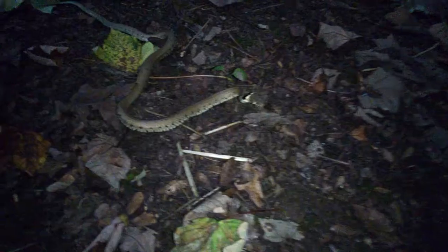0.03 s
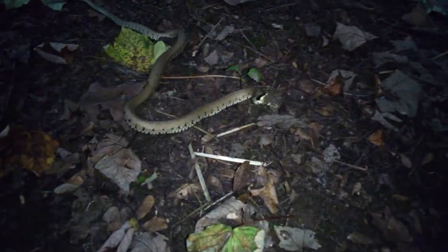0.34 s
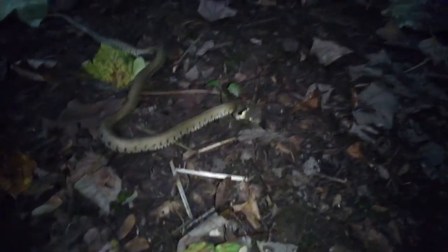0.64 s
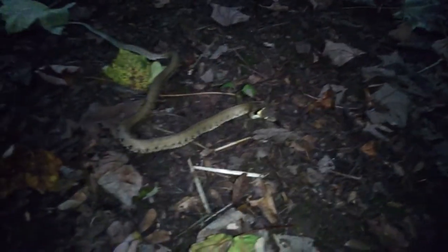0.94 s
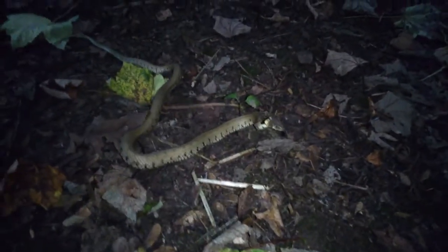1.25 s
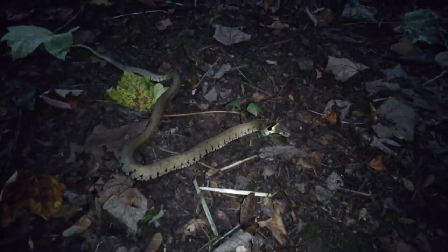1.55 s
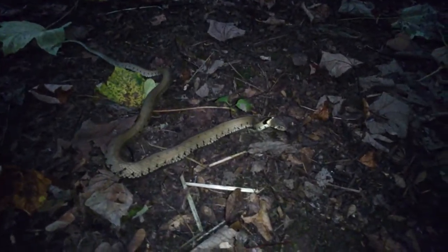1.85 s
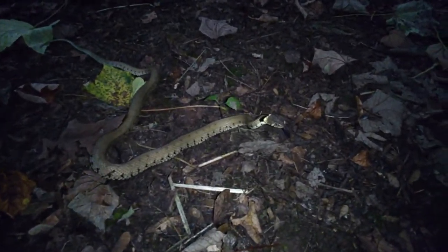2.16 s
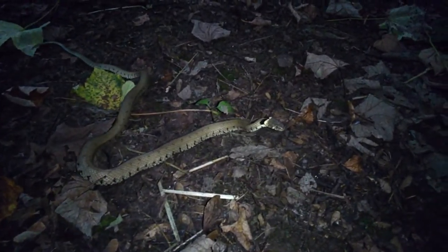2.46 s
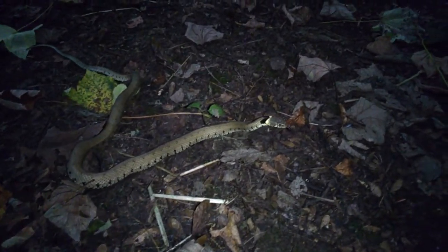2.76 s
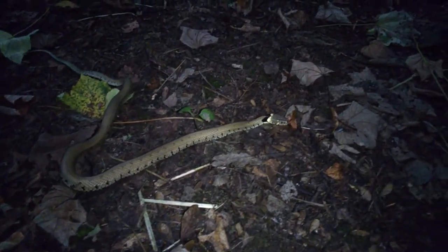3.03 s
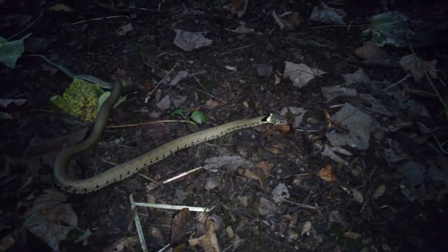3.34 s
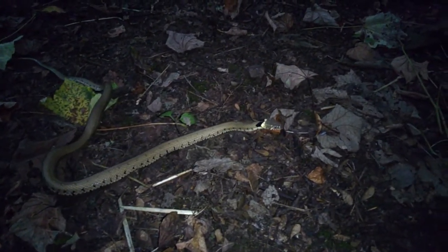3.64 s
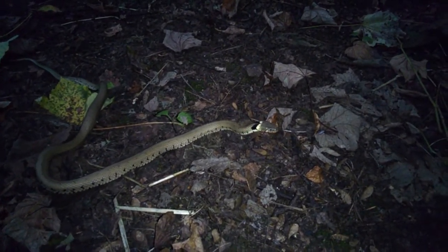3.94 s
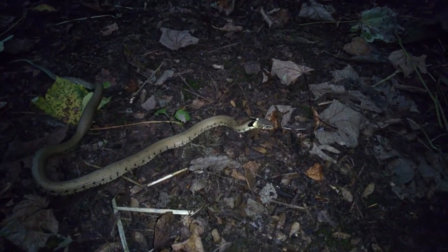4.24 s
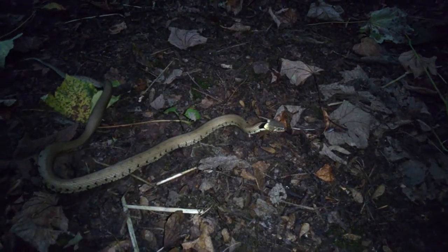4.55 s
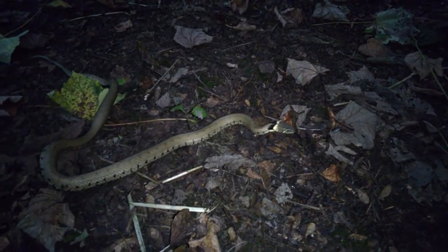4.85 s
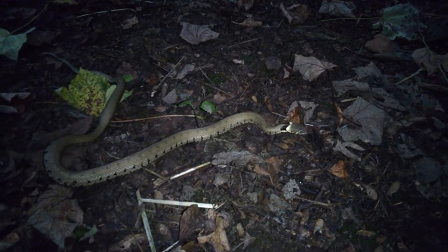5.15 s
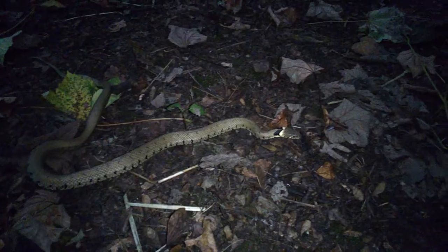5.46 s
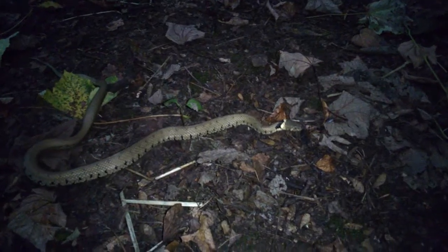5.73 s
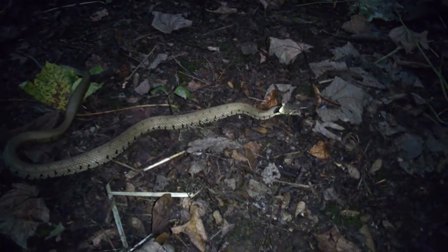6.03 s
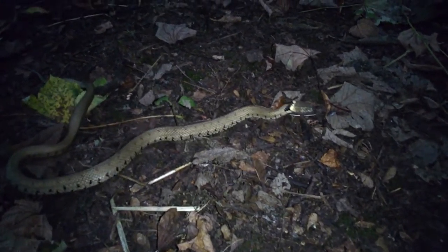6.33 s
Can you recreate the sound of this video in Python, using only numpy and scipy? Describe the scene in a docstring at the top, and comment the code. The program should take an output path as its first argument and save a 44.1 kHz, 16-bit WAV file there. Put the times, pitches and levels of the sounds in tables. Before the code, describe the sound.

Distant wind rumbles through a quiet wood for the whole six and a half seconds, swelling gently over a thin hiss. Faint, high bird calls echo from far trees. At about 0.8 seconds dry leaf litter gives one short, soft crunch underfoot, toward the left. From 1.2 to 2 seconds a far bird steps down four faint notes, and a very faint high tone wavers around 2.6 seconds. From 3.7 to 5.4 seconds a small, nearer songbird on the right sings one thin phrase of quick slurs and buzzy trills, loudest around 4.5 seconds and falling in pitch, each note trailing a long echo among the trunks. Faint far calls return around 6 seconds. Tiny dry handling ticks touch the handheld microphone here and there, clearest at about 1.6, 5.4 and 6.4 seconds.

```python
"""A quiet wood, microphone in the hand. Far wind rumbles and swells throughout, with a few handling ticks.
Faint birds call from the trees, and just before the first second dry litter crunches underfoot.
One far bird steps down a run of four notes; at 2.55 s a faint tone wavers near 3.9 kHz.
From 3.7 s a small, nearer songbird off to the right sings one thin, falling phrase;
the trunks scatter each note into a long tail."""
import sys
import numpy as np
from scipy import signal
from scipy.fft import rfft, irfft
from scipy.io import wavfile

SR = 44100
rng = np.random.default_rng(int(sys.argv[2]) if len(sys.argv) > 2 else 0)


def int16_out(signal):
    """Quantize to a 16-bit WAV file."""
    q = np.round(np.clip(np.atleast_2d(signal).T, -1, 1) * 32767)
    wavfile.write(sys.argv[1], SR, q.astype(np.int16))


N = 286209


def from_db(db):
    """Decibels to gain."""
    return 10 ** (np.asarray(db) / 20)


def rms_one(x):
    """Scale to unit power."""
    return x / np.sqrt(np.mean(x ** 2) + 1e-20)


def at_hz(points, hz):
    """Read a curve on a log-frequency axis."""
    known_hz, values = np.transpose(points)
    return np.interp(np.log(hz + 1e-9), np.log(known_hz), values)


def drift(per_s, size):
    """A random wander of spread about 1, turning per_s times a second."""
    position = np.arange(size) * per_s / SR
    return np.interp(position, np.arange(1024), rng.standard_normal(1024))


def add(track, s, sound):
    """Mix a sound in at s seconds."""
    start = int(s * SR)
    track[..., start:start + sound.shape[-1]] += sound[..., :N - start]


def panned(lean_db):
    """Left and right gains of constant power; a positive lean is to the left."""
    return rms_one(from_db([[lean_db / 2], [-lean_db / 2]]))


def air_noise(spectrum):
    """Unit-power noise of a given colour, alike on both sides in the bass, unrelated in the treble."""
    # Each row: frequency in Hz, correlation of left and right.
    likeness = [(50, .985), (150, .99), (300, .97), (700, .85), (1400, .45), (2800, .15), (12000, .05)]
    # Each row: frequency in Hz, left over right in dB.
    lean = [(35, -9), (85, 1.5), (180, 2.5), (380, 2.5), (700, 4.5), (1400, -3), (2800, 2.5), (7000, -11),
            (13000, -4.5)]
    # Each row: frequency in Hz, phase lead of the microphone's left port in radians.
    lead = [(35, .95), (85, .7), (180, .55), (400, .45), (900, .3), (2000, 0)]
    hz = np.arange(N // 2 + 1) * SR / N
    mid, side = rfft(rng.standard_normal((2, N)))
    alike = at_hz(likeness, hz)
    sides = np.array([[1], [-1]])
    pair = np.sqrt(1 + alike) * mid + np.sqrt(1 - alike) * side * sides
    ports = from_db(sides * at_hz(lean, hz) / 2) * np.exp(.5j * sides * at_hz(lead, hz))
    low_hz, high_hz = spectrum[0][0], spectrum[-1][0]
    skirts = 1 / np.sqrt((1 + (hz / high_hz) ** 12) * (1 + (low_hz / (hz + 1)) ** 12))
    return rms_one(irfft(pair * ports * skirts * from_db(at_hz(spectrum, hz)), N))


def wood(x, build_s, early_t60, late_t60, late_db):
    """Echoes off near and far trunks build up, then die away as the sum of two decays."""
    t = np.arange(2 * SR) / SR
    fade = from_db(-60 * t / early_t60) + from_db(late_db - 60 * t / late_t60)
    echoes = rng.standard_normal((2, len(t))) * fade * (1 - np.exp(-t / build_s))
    echoes /= np.sqrt(np.sum(echoes ** 2, axis=1, keepdims=True))
    return signal.fftconvolve(x[None], echoes, axes=1)[:, :N]


def wind(lull_rush_db=-49.5, lull_rumble_db=-37, buffet_db=0.83, hiss_db=-64):
    """Gusts in the far treetops swell a deep rumble and a softer rush, over a thin, even hiss."""
    # Each row: crest in seconds, half-width in seconds, added rush in dB, added rumble in dB.
    gusts = [(.58, 0.33, -43.5, -39.5), (2.25, 0.33, -51.5, -59), (2.95, 0.84, -51.5, -39.5),
             (3.55, 0.32, -45.5, -40.5), (4.1, 0.36, -46, -41.5), (5.379, 0.32, -44, -41.5),
             (5.98, 0.4, -44.5, -39.5)]
    # The three noise colours. Each row: frequency in Hz, relative spectral density in dB.
    rumble_colour = [(20, -41), (32, -19), (42, -16.5), (55, -3), (75, -0.5), (110, 3), (160, 1),
                     (230, -2.5), (310, -7), (420, -20.5), (600, -66)]
    rush_colour = [(240, 0.5), (330, -1.5), (420, -3.5), (540, -6.5), (690, -13.5), (900, -15),
                   (1250, -23.5), (1750, -34), (2500, -44.5), (3500, -66)]
    hiss_colour = [(1500, 8.5), (2200, 2), (3200, 2.3), (4200, 2.6), (6500, 0), (8200, 2), (10000, -1.2),
                   (14500, -1)]
    t = np.arange(N) / SR
    rush_power, rumble_power = from_db(lull_rush_db) ** 2, from_db(lull_rumble_db) ** 2
    for s, width, rush_db, rumble_db in gusts:
        swell = np.exp(-((t - s) / width) ** 2)
        rush_power = rush_power + swell * from_db(rush_db) ** 2
        rumble_power = rumble_power + swell * from_db(rumble_db) ** 2
    rumble = np.sqrt(rumble_power) * air_noise(rumble_colour)
    rush = np.sqrt(rush_power) * air_noise(rush_colour)
    buffeting = from_db(buffet_db * drift(13, N))
    return buffeting * (rumble + rush) + from_db(hiss_db) * air_noise(hiss_colour)


def handling_ticks():
    """Tiny dry snaps at the microphone, each a click with a gritty tail and a faint echo from the trees."""
    # Each row: start in seconds, peak before panning in dB, lower and upper band edges in Hz,
    # time to fall 60 dB in seconds, left over right in dB.
    ticks = [ (0.115, -42, 4800, 9300, 0.028, -12.5), (0.223, -42, 1200, 2700, 0.012, -18),
             (0.82, -35, 620, 800, 0.03, 18), (1.599, -41, 3650, 5430, 0.011, 19.5),
             (1.6006, -29, 950, 2240, 0.0062, 27), (1.601, -33.5, 450, 840, 0.025, 9),
             (1.616, -46, 1400, 2600, 0.054, 20), (2.3143, -44, 3200, 11000, .008, -21),
             (2.58, -41, 4000, 10300, 0.1, -23), (4.96, -54, 8300, 9800, 0.035, -32.5),
             (5.4337, -30.5, 890, 11300, 0.0063, 2), (6.109, -43, 1100, 3470, 0.02, 9),
             (6.3693, -29.5, 7450, 13500, 0.013, -31), (6.3693, -43, 900, 6500, 0.008, -12)]
    out = np.zeros((2, N))
    t = np.arange(SR // 10) / SR
    click = t == 0
    for s, peak_db, low_hz, high_hz, t60, lean_db in ticks:
        grit = .1 * rng.standard_normal(len(t)) * from_db(-60 * t / t60)
        band = signal.butter(2, [low_hz, high_hz], "band", fs=SR, output="sos")
        snap = signal.sosfilt(band, click + grit)
        add(out, s, panned(lean_db) * from_db(peak_db) * snap / np.abs(snap).max())
    echo = wood(out.mean(0), build_s=0.004, early_t60=0.065, late_t60=0.9, late_db=-13)
    return out + from_db(-4.5) * echo


def tone(pitch, level_db, waver, flutter_db):
    """A pure tone along a pitch path, swelling and fading, unsteady in pitch and strength."""
    size = len(pitch)
    phase = 2 * np.pi * np.cumsum(pitch * (1 + waver * drift(304.4, size))) / SR
    loudness = from_db(level_db + flutter_db * drift(107.3, size)) * signal.windows.tukey(size, .5)
    return np.sqrt(2) * loudness * np.sin(phase)


def trill(per_s, size):
    """A fast, uneven swing between -1 and 1 that shakes a note's pitch."""
    rate = per_s * from_db(2 * drift(58.8, size))
    return np.sin(2 * np.pi * np.cumsum(rate) / SR)


def far_birds_and_faint_tone(sag_share=0.0264, trill_share=0.01):
    """Far bird calls, and a faint, wavering tone near 3.9 kHz at 2.55 s; all sag and are heard as echo."""
    # Each row: start and length in seconds, pitch in Hz, level in dB,
    # hoarseness (random swing as a share of the pitch).
    tones = [ (.16, 0.064, 7210, -65.5, 0.023), (.33, 0.085, 4640, -78, 0.034),
             (0.886, 0.086, 6950, -65, 0.022), (1.02, 0.15, 6840, -74.5, 0.024),
             (1.16, 0.22, 3150, -71, 0.048), (1.6, 0.166, 4910, -76.5, .02), (1.89, 0.11, 4610, -72, .025),
             (2.1, 0.55, 4160, -79, 0.026), (2.55, 0.22, 3870, -72, 0.02), (2.96, 0.23, 5670, -80, 0.016),
             (3.078, 0.1, 7210, -59, 0.022), (3.088, 0.068, 8540, -67, .02),
             (3.72, 0.147, 3530, -68, 0.054), (4.14, 0.18, 3320, -68.5, 0.066),
             (5.94, 0.13, 5750, -71, 0.012), (6.117, 0.146, 3980, -70, .02), (6.14, 0.2, 5630, -64.5, .018),
             (6.22, 0.1, 3450, -73, 0.021), (6.35, 0.1, 7480, -60.5, 0.029)]
    # One bird sings an even run of four, each note a step lower.
    step_s, step_hz = .183, 240
    falling_run = [(1.22 + k * step_s, .26, 7160 - k * step_hz, -64.5, 0.0249) for k in range(4)]
    out = np.zeros(N)
    for s, length, hz, level_db, hoarseness in tones + falling_run:
        size = int(length * SR)
        sag = sag_share * np.linspace(.5, -.5, size)
        quiver = trill_share * trill(per_s=41, size=size)
        add(out, s, tone(hz * (1 + sag + quiver), level_db, waver=hoarseness, flutter_db=5.0))
    return panned(lean_db=-12.0) * wood(out, build_s=0.00059, early_t60=1.0, late_t60=0.84, late_db=-9)


def rustle(start_s=0.79, attack_s=0.02, release_after_s=0.1, t60=0.16, level_db=-56.5, grain_db=3.0):
    """Dry litter shifts underfoot: a short crackly hiss that rises, holds and dies."""
    # Each row: frequency in Hz, relative spectral density in dB.
    litter_colour = [(1800, 3), (2300, -18), (3000, -6), (5500, -14), (8000, -5), (13000, -17)]
    t = np.arange(N) / SR - start_s
    attack = np.clip(t / attack_s, 0, 1)
    release_db = -60 * np.maximum(t - release_after_s, 0) / t60
    crackle_db = grain_db * drift(130, N)
    return attack * from_db(level_db + release_db + crackle_db) * air_noise(litter_colour)


def crunch(grains_per_s=820):
    """Within the rustle, hard left, dense grains of crushed litter ring in its hollows."""
    # Each row: start and length in seconds, resonance and its width in Hz, level in dB.
    hollows = [(0.811, 0.053, 706, 127, -49), (0.812, 0.097, 1600, 258, -60.5)]
    out = np.zeros(N)
    for s, length, hz, width_hz, level_db in hollows:
        size = int(length * SR)
        grains = (rng.random(size) < grains_per_s / SR) * rng.standard_normal(size)
        body = signal.lfilter(*signal.iirpeak(hz, hz / width_hz, fs=SR), grains)
        add(out, s, from_db(level_db) * rms_one(body) * signal.windows.tukey(size, .3))
    return panned(lean_db=27) * out


def song(slur_fade_db=1.5):
    """The near bird's phrase: slurs sweep to a turning pitch and hook back; held notes ring or buzz."""
    # Each row: start and length in seconds, turning point as a share of the length, turning pitch in Hz,
    # start above that pitch as a share of it (negative makes an arch), level at the turn in dB.
    slurs = [ (3.727, 0.028, 0.78, 6730, 0.31, -44.5), (3.760, 0.029, 0.7, 5360, 0.39, -47),
             (3.876, 0.0193, 0.64, 3950, 0.33, -42.5), (4.02, 0.02, 0.92, 5250, 0.46, -46),
             (4.428, 0.033, 0.99, 6520, 0.34, -37.5), (4.608, 0.028, 0.65, 8140, -0.11, -40),
             (4.623, 0.028, 1, 5300, 0.57, -44.5), (4.733, 0.021, 0.44, 4125, 0.19, -40.5),
             (4.769, 0.022, 0.61, 3560, 0.2, -44), (4.801, 0.028, 0.5, 3065, 0.27, -48),
             (5.069, 0.014, 1, 4460, 0.26, -45), (5.090, 0.0198, 0.88, 5940, 0.19, -44),
             (5.167, 0.016, 0.75, 4050, 0.21, -43.5), (5.194, 0.022, 0.54, 4500, -0.36, -39),
             (5.226, 0.0337, 0.79, 3834, -.17, -43.5), (5.305, 0.0157, 0.92, 4170, 0.2, -40),
             (5.327, 0.016, 0.87, 4940, -0.33, -43)]
    # Each row: start and length in seconds, pitch and trill depth in Hz (wider is rougher), level in dB.
    held_notes = [ (3.755, 0.032, 6740, 210, -46.5), (3.889, 0.019, 4060, 30, -51),
                  (3.969, 0.088, 7250, 710, -48), (4.033, 0.06, 6850, 160, -41),
                  (4.065, 0.05, 5850, 118, -46), (4.091, 0.11, 7440, 698, -40.5),
                  (4.201, 0.069, 7770, 120, -42.5), (4.449, 0.19, 7740, 623, -42.5),
                  (4.485, 0.069, 7530, 127, -35), (4.744, 0.012, 4690, 40, -45),
                  (4.784, 0.046, 6870, 516, -47), (5.039, 0.032, 7260, 252, -42.5),
                  (5.099, 0.016, 5920, 39.5, -41), (5.241, 0.028, 3790, 120, -46),
                  (5.34, 0.042, 4557, 25, -42)]
    out = np.zeros(N)
    for s, length, turn_at, turn_hz, sweep, level_db in slurs:
        bend = (np.linspace(0, 1, int(length * SR)) / turn_at - 1) ** 2
        pitch = turn_hz * (1 + sweep * bend)
        slur_db = level_db + slur_fade_db * bend   # softest at the turn
        add(out, s, tone(pitch, slur_db, waver=0.004, flutter_db=3.0))
    for s, length, hz, depth_hz, level_db in held_notes:
        pitch = hz + depth_hz * trill(per_s=120, size=int(length * SR))
        add(out, s, tone(pitch, level_db, waver=0.414 * depth_hz / hz, flutter_db=2.0))
    return out


def near_bird(scatter_hz=5100, low_direct_db=-7, high_direct_db=-22):
    """Off to the right: low notes arrive directly and as echo; leaves scatter nearly all of the highs."""
    voice = song()
    low = signal.sosfilt(signal.butter(8, scatter_hz, "low", fs=SR, output="sos"), voice)
    high = signal.sosfilt(signal.butter(8, scatter_hz, "high", fs=SR, output="sos"), voice)
    direct = from_db(low_direct_db) * low + from_db(high_direct_db) * high
    low_echo = from_db(-4) * wood(low, build_s=0.024, early_t60=0.56, late_t60=1.6, late_db=-7)
    high_echo = wood(high, build_s=.018, early_t60=0.51, late_t60=1.27, late_db=-3.5)
    return panned(lean_db=-14.5) * (direct + low_echo + high_echo)


def scene():
    """Birds, a faint tone, handling ticks, leaf litter and wind, as they meet at the microphone."""
    litter = rustle() + crunch()
    return near_bird() + far_birds_and_faint_tone() + handling_ticks() + litter + wind()


def record(dry, cutoff_hz=14300):
    """The top of the treble is cut steeply."""
    return signal.sosfilt(signal.ellip(12, .2, 80, cutoff_hz, fs=SR, output="sos"), dry)


dry = scene()
out = record(dry)
int16_out(out)
```